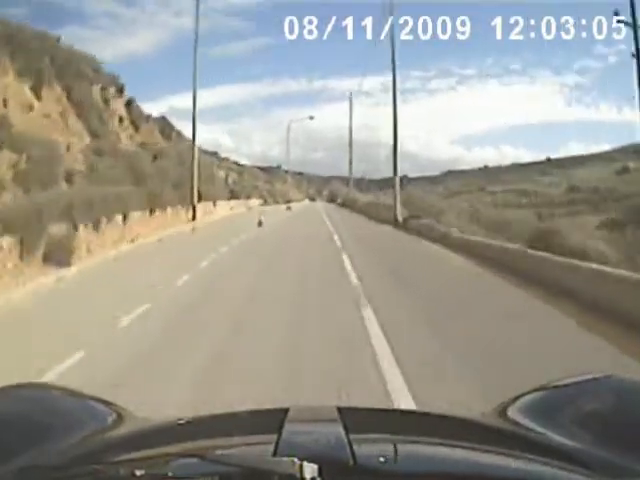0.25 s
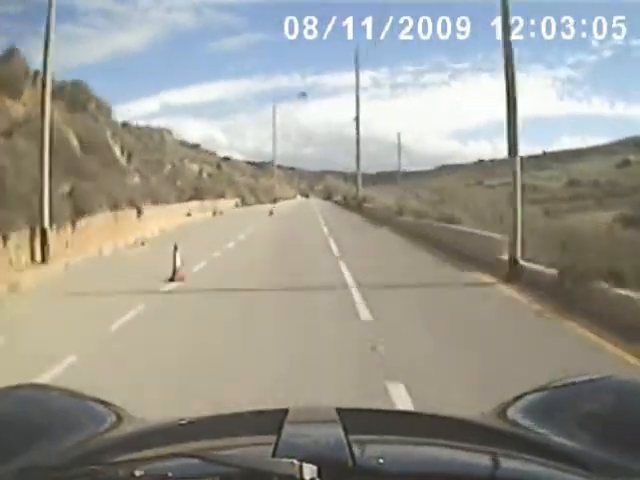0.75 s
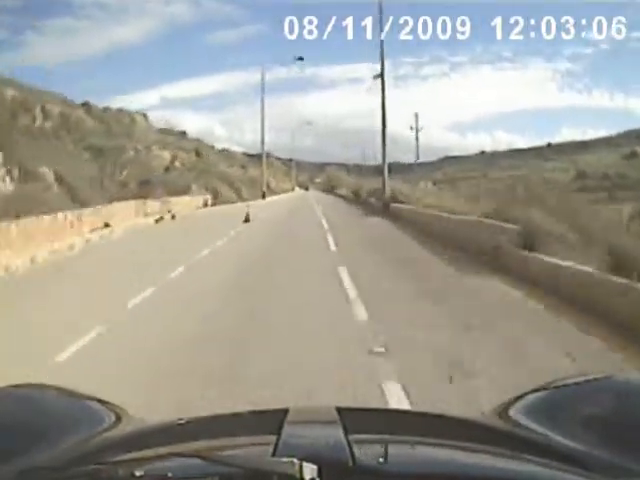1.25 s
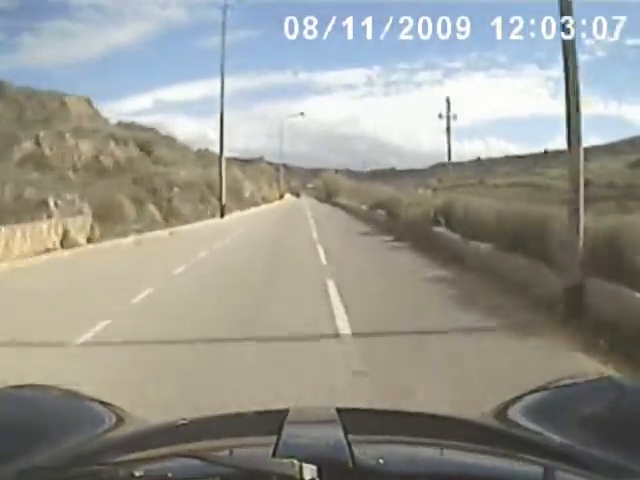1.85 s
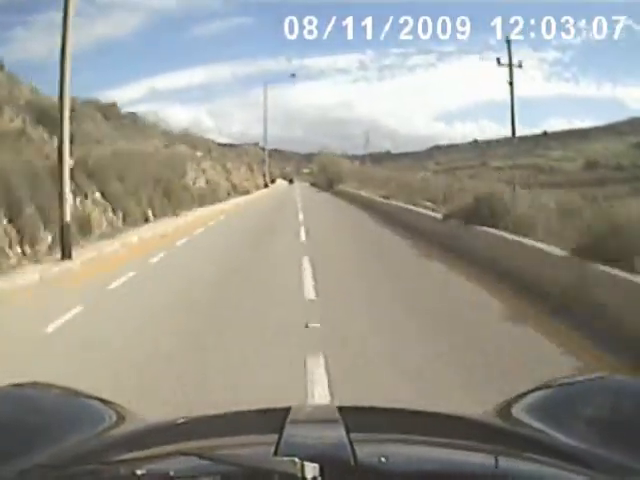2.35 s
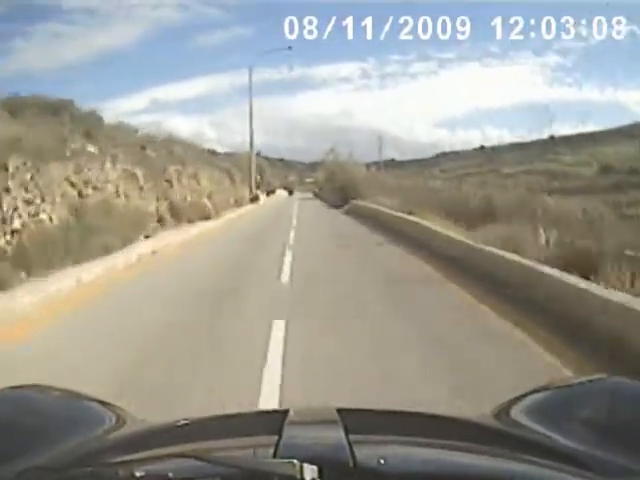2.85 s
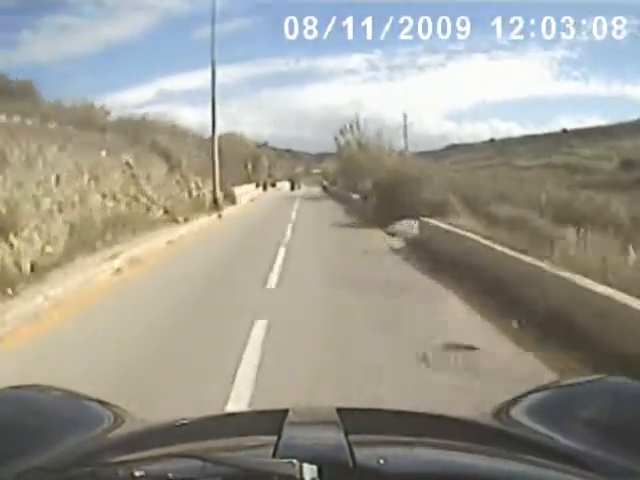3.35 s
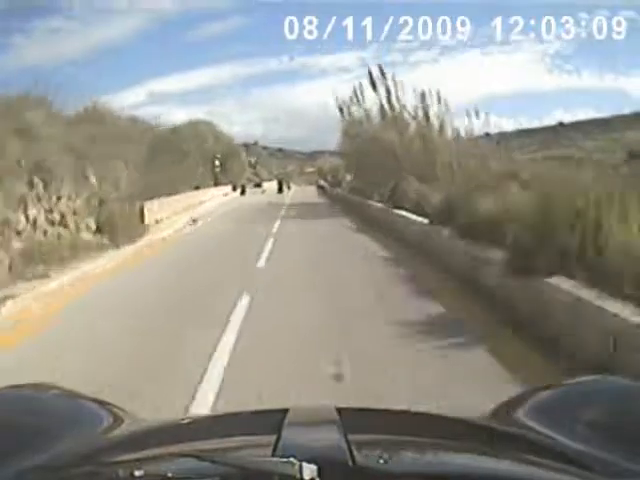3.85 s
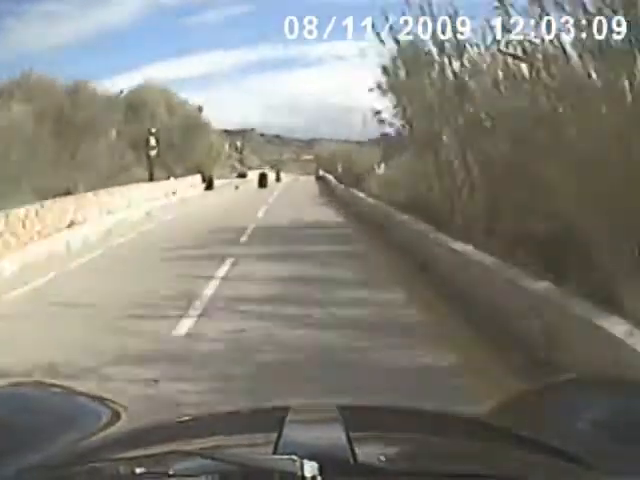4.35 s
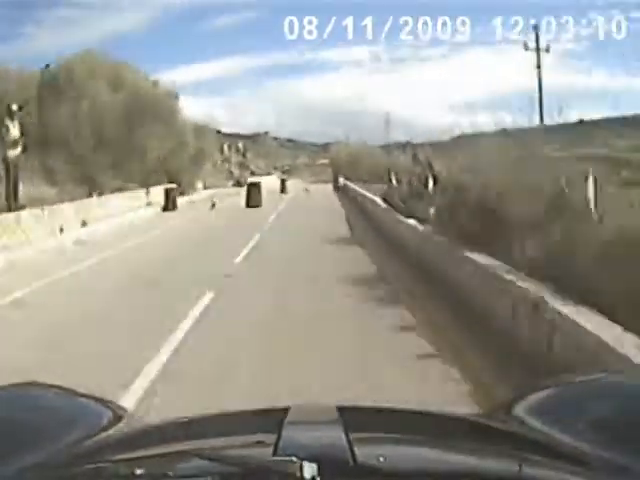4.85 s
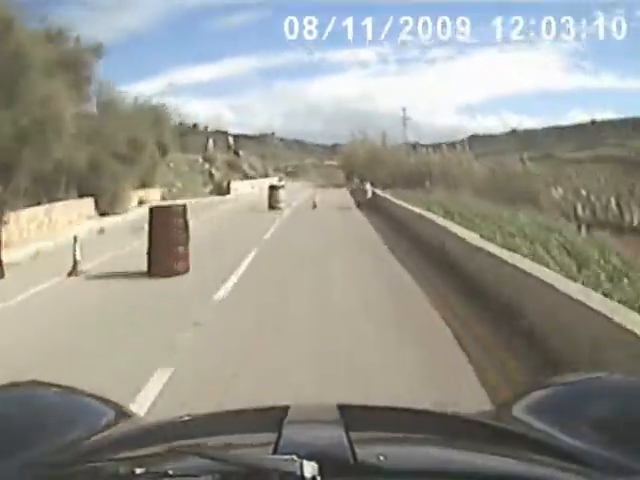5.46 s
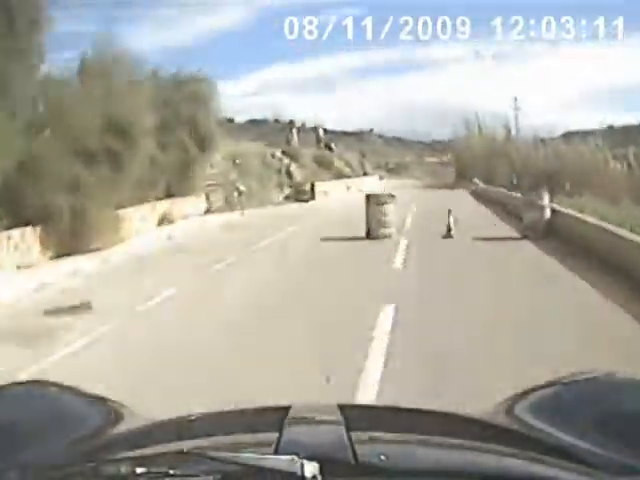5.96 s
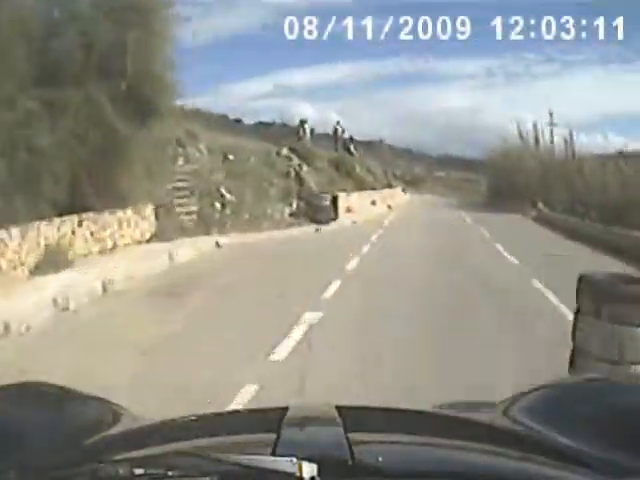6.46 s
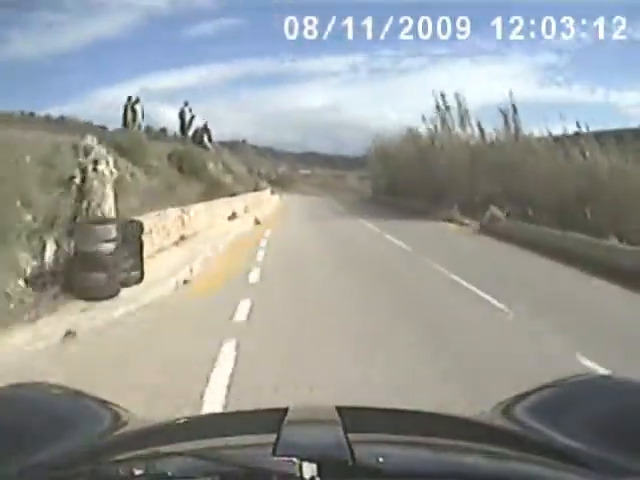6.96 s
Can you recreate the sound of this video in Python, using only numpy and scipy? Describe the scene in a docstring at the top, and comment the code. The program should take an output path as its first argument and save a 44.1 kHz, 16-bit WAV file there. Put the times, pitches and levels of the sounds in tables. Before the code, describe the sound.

Close on-board sound in a small, boomy car on an open road. A hard four-cylinder drone starts suddenly after silence and rises steadily to a gear change. After a short pull the throttle closes, with body knocks, a burst of road rumble and sharp loose-part ticks. Revs blip, then fall to a low hollow overrun, followed by a rattle and renewed pull.

```python
"""After a short silence a four-cylinder sports car bursts in, heard from the cockpit, already pulling hard. It
changes up, lifts, brakes and blips down, then pulls again. The engine is a bank of sines on the multiples of
its four-stroke cycle, ringing through exhaust and cabin. Shaped noise gives intake roar, rasp and road rumble,
and a thin noise fills the top treble early on; faint locked tones are sines. Loose parts tick as short noise
bursts; body knocks and metal chinks are decaying sines."""
import sys
import numpy as np
from scipy import signal
from scipy.fft import rfft, irfft
from scipy.io import wavfile
from scipy.ndimage import uniform_filter1d

SR = 44100
rng = np.random.default_rng(int(sys.argv[2]) if len(sys.argv) > 2 else 0)


def put_to_file(sound):
    """Save the sound as 16-bit audio at rate SR, in the file named by the first command-line argument."""
    columns = np.atleast_2d(sound).T  # one column per channel
    safe = np.clip(columns, -1, 1)
    whole_steps = np.round(safe * 32767)
    wavfile.write(sys.argv[1], SR, whole_steps.astype(np.int16))


N = 318402  # length [samples]


def amp(db):
    """Decibels to gain."""
    return 10 ** (np.asarray(db) / 20)


def evened(x):
    """Scales to rms 1."""
    return x / np.sqrt(np.mean(x ** 2) + 1e-20)


def smoothed_twice(x, size):
    """Two running means in a row along the last axis: a slow, smooth drift."""
    return uniform_filter1d(uniform_filter1d(x, size=size), size=size)


def read_spectrum(points, hz):
    """Reads a spectrum on a log-frequency axis."""
    f, value = np.transpose(points)
    return np.interp(np.log(hz + 1), np.log(f + 1), value)


def curves(rows, step=1):
    """All columns of a table of curves over time, one value every step samples."""
    s, *columns = np.transpose(rows)
    return [np.interp(np.arange(0, N, step) / SR, s, column) for column in columns]


def resonance_gain(modes, hz):
    """Gain of a set of steep resonances, their powers summed."""
    return np.sqrt(sum(amp(db) ** 2 / (1 + (2 * (hz - f) / width) ** 2) ** 1.41 for f, width, db in modes))


def resonance_lag(modes, hz):
    """Phase [rad] that a wave loses on its way through a chain of resonances."""
    return sum(np.arctan(2 * (hz - f) / width) for f, width, _ in modes)


def add(mix, s, sound):
    """Adds a sound at time s [s]."""
    part = mix[round(s * SR):][:len(sound)]
    part += sound[:len(part)]


def noise(spectrum, patchy_db, flicker_db):
    """Coloured noise at rms 1, with random patches of level and a flicker shared by all frequencies."""
    frames, hz = N // 256 + 5, np.fft.rfftfreq(1024, 1 / SR)
    real, imaginary, patches = rng.standard_normal((frames, 513, 3)).T
    patches = uniform_filter1d(patches, size=9, axis=0)  # across frequency
    patches = evened(uniform_filter1d(patches, size=10, axis=1))  # across time
    flicker = evened(uniform_filter1d(rng.standard_normal(frames), size=4))
    db = read_spectrum(spectrum, hz)[:, None] + patchy_db * patches + flicker_db * flicker
    bins = (real + 1j * imaginary) * amp(db)
    return evened(signal.istft(bins, nperseg=1024, noverlap=768)[1][:N])


# engine speed: (time [s], firing rate [Hz])
REVS = [(0.47, 207.8), (0.64, 210), (0.81, 217.9), (0.98, 224), (1.32, 237.7), (1.49, 241.4), (1.66, 249.5),
        (2.0, 259.6), (2.2, 269.3), (2.26, 266.3), (2.32, 251.2), (2.5, 233.3), (2.56, 241.6),
        (2.62, 242.6), (2.8, 199.5), (2.86, 194.9), (2.92, 203), (3.0, 201.2), (3.11, 205.6), (3.22, 205.4),
        (3.33, 208.8), (3.44, 198.9), (3.55, 201.8), (3.77, 195.4), (3.88, 184.3), (4.1, 223.3),
        (4.32, 202), (4.65, 226.1), (4.76, 218.4), (4.98, 208.6), (5.2, 195.5), (5.42, 178.6),
        (5.53, 172.2), (5.86, 149.5), (6.08, 150.8), (6.19, 163.3), (6.41, 154.3), (6.52, 161.1),
        (6.74, 166.3), (6.96, 174.2), (7.07, 170.6), (7.2, 177.1)]


def cycles():
    """Four-stroke cycles run so far: four firings each."""
    return np.cumsum(curves(REVS)[0]) / (4 * SR)


def octaves_up():
    """Engine speed in octaves above 200 firings a second."""
    return np.log2(curves(REVS)[0] / 200)


# share of each order of the four-stroke cycle inside its family: (order, relative level [dB])
SHARE = [(1, -28), (2, -5), (3, 4), (5, 3.5), (6, -4), (7, 8), (9, 4), (10, 2.5), (11, 5), (13, 6.5),
         (14, 0), (15, 6.5), (16, 3.5), (17, 4), (20, 4), (24, 0.5), (28, 1), (40, -0.5), (56, -10)]
# cabin and exhaust resonances: (frequency [Hz], width [Hz], relative level [dB])
CABIN = [(50, 44, -10.5), (115, 24, 3), (169.2, 19, 11.5), (213, 12.3, 15), (337, 28, 6), (389, 28.4, -1),
         (498, 92, -1), (599, 59, 8), (730, 33, 9.5), (737.5, 17.6, 10.5), (828, 94, 3), (1070, 85, -3.5),
         (1200, 27, -2.5), (1365, 230, -5), (1483, 240, -8), (2200, 365, -10)]


def order_weights(order, hz, throttle, bright_db, dull, keen_db):
    """Balance of the orders, set by their shares and the cabin, tilted by revs and throttle."""
    weight = amp(np.interp(order, *np.transpose(SHARE))) * resonance_gain(CABIN, order * hz / 4)
    octaves = np.log2(np.maximum(order, 5) / 8)
    # uneven orders brighten with revs
    weight *= amp(bright_db * np.log2(hz / 220) * octaves * (order % 2))
    # crank orders turn dull when the throttle shuts
    weight *= amp(dull * (throttle - 2) * octaves * (order % 4 == 2))
    # on the overrun the high firing orders stand out
    return weight * amp(keen_db * (0.5 - throttle) * np.log2(order / 16) * (order % 4 == 0))


# families that follow the throttle; rows: firing order, its second, its third, uneven cylinders
# (throttle-open level [dB], shut level [dB], how late the family wakes as the throttle opens [exponent])
FAMILIES = [(0.5, -10.5, 1.046), (1.5, -5.5, 2.8), (-13.5, -13.5, 0.59), (-23.5, -58, 3.38)]
# how the exhaust pipe passes the firing note and its overtones: (frequency [Hz], level [dB])
PIPE = [(150, -25.5), (157, -21.5), (170, -28), (190, -29.5), (212, -18.5), (228, -21.5), (245, -26),
        (254, -23), (267, -31.5), (300, -25.5), (320, -27.5), (343, -22), (356, -39), (385, -29),
        (408, -23.5), (445, -29), (465, -33), (485, -19), (525, -22), (550, -31.5), (625, -21.5),
        (655, -25.5), (672, -17), (700, -19), (722, -29.5), (750, -17.5), (785, -28), (810, -19)]
# (time [s], level of the higher firing orders [dB], level of the crank orders [dB])
UPPER = [(.47, -35.5, -31.5), (1.15, -36, -36.5), (1.24, -34.5, -33.5), (1.85, -44, -40),
         (2.22, -29.5, -39), (2.32, -50, -45), (2.52, -49, -44), (2.62, -33, -40), (2.8, -34.5, -35),
         (3.29, -36.5, -31.5), (3.37, -52, -42), (3.57, -55, -38.5), (3.7, -44, -64), (3.95, -48, -38),
         (4.2, -39.5, -45), (4.4, -42, -46), (4.7, -41.5, -33.5), (4.9, -42, -33.5), (5.1, -43.5, -47),
         (5.6, -51.5, -49), (6.1, -54, -54), (6.2, -43.5, -45), (6.5, -48, -54), (6.63, -40.5, -38),
         (7.2, -39, -59)]
UNEVEN_DB_PER_OCTAVE = 3  # uneven orders grow with revs


def order_gains(order, hz, throttle, note_db, overtones_db, weight):
    """Level of each order: the pipe shapes the lowest three firing orders, the weights all the others."""
    levels = [amp(shut_db + (open_db - shut_db) * throttle ** late) for open_db, shut_db, late in FAMILIES]
    note = amp(read_spectrum(PIPE, order * hz / 4) + np.where(order == 4, note_db, overtones_db))
    gain = sum((order == k) * note * level for k, level in zip((4, 8, 12), levels))

    uneven = (order % 2 == 1) * weight * amp(UNEVEN_DB_PER_OCTAVE * np.log2(hz / 220))
    gain = gain + uneven * levels[3] / np.sqrt((uneven ** 2).sum(axis=0).mean())

    higher_firing, crank = (order % 4 == 0) & (order > 12), order % 4 == 2
    for family, db in zip((higher_firing, crank), curves(UPPER, step=64)):
        share = family * weight
        gain = gain + share * amp(db) / np.sqrt((share ** 2).sum(axis=0))
    return gain


# the driver's foot and the engine's answer:
# (time [s], throttle [0-1], firing note level [dB], level of its overtones [dB])
DRIVE = [(.47, 0.94, -2, -0.5), (.64, 0.98, -1, -7), (.9, 0.95, -2, 1), (1.3, 0.95, -1, 3),
         (2.22, 0.98, 0.5, -1), (2.3, 0.65, -1, -6), (2.45, 0.4, 1.5, 1), (2.5, .3, 3, -8),
         (2.55, 1, -3, -3), (2.86, 0.93, -2.5, 1), (3.3, 0.96, -0.5, 0), (3.37, 0.6, -11.5, -2.5),
         (3.44, 0.52, -9, -23), (3.55, 0, 6.5, -3), (3.8, 0.7, -6, -3.5), (3.88, .7, -27, -2),
         (3.99, 0.3, -3, -3), (4.12, 0.6, -16, -6.5), (4.3, 0.57, -11, -3), (4.43, 0.27, -11.5, 0.5),
         (4.54, 0.53, -1.5, -0.5), (4.65, 0.6, -10, -4), (4.8, 0.34, -0.5, 0), (4.98, 0.1, 0, 3.5),
         (5.15, 0.52, -6, -1), (5.3, 0, 4.5, 4), (5.55, 0, 5.5, -6.5), (5.75, 0, 2.5, -6),
         (6.05, 0.2, -1.5, -13), (6.13, 0, -12, -11), (6.19, 0.33, -1, 1), (6.45, 0.03, -10, -1.5),
         (6.63, 0.58, -11, -5), (6.8, 0.84, -8.5, -2.5), (7.2, .9, -6, -5)]


def engine_orders(waver_db, wander, spread, ringing, bright_db, dull, keen_db):
    """Sines on the multiples of the four-stroke cycle, each wavering in level and phase."""
    hz = curves(REVS, step=64)[0]
    throttle, note_db, overtones_db = curves(DRIVE, step=64)
    throttle = np.clip(throttle, 0, 1)
    order = np.arange(1, 57)[:, None]
    weight = order_weights(order, hz, throttle, bright_db, dull, keen_db)
    gain = order_gains(order, hz, throttle, note_db, overtones_db, weight)

    chance = rng.standard_normal((2, len(order), len(hz)))
    level_drift, phase_drift = (evened(smoothed_twice(c, size=30)) for c in chance)
    unrest = order / 12  # high orders waver more
    gain = np.sqrt(2) * gain * amp(waver_db * unrest * level_drift)
    # low orders stay near-aligned and throb once a cycle; the cabin smears each pulse in time
    phase = unrest * (wander * phase_drift + spread * rng.standard_normal(order.shape))
    phase -= ringing * resonance_lag(CABIN, order * hz / 4)

    cycle, at, coarse = cycles(), np.arange(N), np.arange(len(hz)) * 64
    return sum(np.interp(at, coarse, g) * np.cos(2 * np.pi * k * cycle + np.interp(at, coarse, p))
               for k, g, p in zip(order[:, 0], gain, phase))


def puffing(depth, uneven):
    """Each firing lets out a puff; one cylinder puffs harder."""
    turn = 2 * np.pi * cycles()
    return evened(np.exp(depth * np.cos(4 * turn) + uneven * np.cos(turn)))


# colour of the roar: (frequency [Hz], relative density [dB per Hz])
ROAR = [(60, -35), (140, -3), (230, -23.5), (300, -3), (480, 2), (740, -9), (1000, -13), (1400, -14.5),
        (1800, -33), (6000, -100)]
# swells of the roar: (time [s], level [dB])
ROARING = [(.47, -30.5), (.64, -37), (1.2, -34.5), (1.9, -29), (2.1, -34.5), (2.26, -28.5), (2.48, -33.5),
           (2.66, -29.5), (2.82, -41), (3.15, -40), (3.35, -33), (3.68, -33), (3.78, -29), (3.83, -32.5),
           (3.88, -25.5), (3.94, -31.5), (4.04, -30.5), (4.43, -36.5), (5.2, -40), (6.05, -41.5),
           (6.15, -37), (6.41, -39.5), (6.55, -32.5), (6.74, -39), (7.2, -38.5)]


def roar():
    """Turbulent intake and body boom between the orders: noise puffing with the firings."""
    sound = noise(ROAR, patchy_db=-2.0, flicker_db=2.0)
    return amp(curves(ROARING)[0]) * sound * puffing(depth=.3, uneven=0.12)


# colour of the rasp: (frequency [Hz], relative density [dB per Hz])
RASP = [(600, -28), (900, -7.5), (1100, -4), (1450, -4), (1870, -10), (2250, -8), (2750, -10.5),
        (3000, -17.5), (3510, -14.5), (4000, -21.5), (5100, -23), (6900, -27), (8000, -33), (12800, -35.5),
        (13500, -49.5), (14200, -88)]
RASP_DB, RASP_OPEN_DB, RASP_DB_PER_OCTAVE = -46, 2.5, 12  # throttle shut, gain when open, rise with revs
RASP_SHAKE = 0.17  # share of the road rumble's slow swings [dB] that the rasp follows


def rasp():
    """Valve gear and exhaust hiss, chopped by the firings; grows with revs and on rough road."""
    road_swing_db = uniform_filter1d(curves(ROAD)[0], size=20000) + 42
    db = RASP_DB + RASP_OPEN_DB * curves(DRIVE)[0]
    db = db + RASP_DB_PER_OCTAVE * octaves_up() + RASP_SHAKE * road_swing_db
    return amp(db) * noise(RASP, patchy_db=1.5, flicker_db=0.23) * puffing(depth=0.053, uneven=0.042)


# swells of faint tones locked to the engine cycle: gear whine at 83.5 turns, high firing orders at 36 and 44
# (centre [s], half length [s], level [dB], turns per four-stroke cycle)
LOCKED_TONES = [(1.57, .06, -57, 83.5), (5.55, .2, -57, 36), (5.55, .2, -59, 44), (5.6, .22, -63, 83.5),
                (6.28, .08, -61, 83.5), (6.95, .2, -66, 83.5)]


def locked_tones():
    """Gear whine and high firing orders: sines locked to the engine cycle, wavering in level and phase."""
    waver = evened(smoothed_twice(rng.standard_normal(N), size=1500))
    t, cycle_phase = np.arange(N) / SR, 2 * np.pi * cycles()
    tones = sum(amp(db) * np.exp(-((t - s) / half) ** 2) * np.sin(turns * cycle_phase + 0.49 * waver)
                for s, half, db, turns in LOCKED_TONES)
    return amp(1.4 * waver) * tones


# dull blows through the body, from the exhaust or the suspension:
# (time [s], level before attack and decay [dB], brightness [dB per octave])
KNOCKS = [(2.512, -18.5, 2.5), (2.533, -14, 2), (3.416, -25, -10), (3.745, -30, 10), (3.772, -24, 2),
          (3.80, -25, 1), (3.813, -25.5, 9), (3.865, -22, 0), (3.995, -25, -2), (4.004, -22, 2),
          (6.481, -31, 7), (6.505, -32, 7), (6.553, -28, 4)]


def knocks():
    """Each blow rings the cabin resonances for a moment as quickly dying sines."""
    out, t = np.zeros(N), np.arange(2000) / SR
    envelope = (1 - np.exp(-t / 0.00043)) * np.exp(-t / 0.0083)
    for (s, db, tilt_db), turns in zip(KNOCKS, rng.random((len(KNOCKS), len(CABIN)))):
        ring = sum(amp(level + tilt_db * np.log2(hz / 500)) * np.sin(2 * np.pi * (hz * t + turn))
                   for (hz, _, level), turn in zip(CABIN, turns))
        add(out, s, amp(db) * evened(ring) * envelope)
    return out


# loose parts knocking: (time [s], nominal peak level [dB], brightness [dB per octave], length [ms])
TICKS = [(3.657, -26.5, -8, 4.9), (3.672, -33, 11, 3.8), (3.699, -25, -4, 2.32), (3.721, -22, 0.5, 2.1),
         (3.766, -31, 1, 3.6), (3.772, -25, -8, 4.4), (3.811, -25, -3, 4.5), (3.890, -18, 10, 2.4),
         (3.897, -25.5, -8, 7.5), (3.919, -42, 11, 4.9), (4.168, -20, 9.5, 3.8), (4.207, -22.5, -0.5, 2.5),
         (4.304, -26.5, 3, 2.5), (4.347, -35, 2, 5.8), (4.372, -26, 0, 2.2), (4.554, -37, 8, 3.6),
         (5.085, -30, 1.5, 6.2), (5.132, -40, 5, 7.1), (5.525, -39.5, 10, 6.6), (6.110, -31.5, -3, 8.1),
         (6.163, -30.5, -15, 12.6), (6.226, -41, -1, 6.6), (6.312, -39, 11, 3), (6.419, -33, 0, 3.1),
         (6.436, -40, 6, 6.6), (6.480, -28, -1.5, 7.1), (6.496, -25, -2, 3.5), (6.507, -33, -2, 5.4),
         (6.548, -15, -0.5, 5.6), (6.586, -33, -5, 9.7), (6.621, -30, -2, 4.7), (6.633, -33.5, -3, 10.6),
         (6.669, -35, 0, 3.7), (6.688, -30, 0, 3.6), (6.762, -34, 0, 13.4), (6.820, -33, 5, 2.2),
         (6.844, -36, 4, 3.4), (7.062, -29.5, -5, 10.6), (7.149, -32, 4.5, 11), (7.200, -42, 5, 4.2)]
# what the ticks ring in: (frequency [Hz], width [Hz], relative level [dB])
PANEL = [(2370, 370, 10), (4040, 1040, 2), (5860, 1860, -1), (7840, 810, -32), (10140, 450, -12),
         (11170, 290, -20), (11850, 280, -11)]


def ticks(rows):
    """Short bursts of noise in the panel resonances, with a weaker rattle after."""
    out, t, hz = np.zeros(N), np.arange(2048) / SR, np.fft.rfftfreq(2048, 1 / SR)
    # nothing below 900 Hz, steep fall above 13.3 kHz
    panel = resonance_gain(PANEL, hz) * (hz > 900) / (1 + (hz / 13300) ** 24)
    for (s, db, tilt_db, ms), burst in zip(rows, rng.standard_normal((len(rows), len(t)))):
        colour = panel * amp(tilt_db * np.log2((hz + 1) / 5000))
        u = t * 1000 / max(ms, .3)  # time in tick lengths
        shape = (1 - np.exp(-t / 0.0013)) * (np.exp(-u ** 2) + 0.3 * np.exp(-u / 2.9))
        # noise peaks stand about 10 dB above its rms
        add(out, s, amp(db - 10) * evened(irfft(rfft(burst) * colour)) * shape)
    return out


# faint ticks: rate, lowest nominal peak, spread above it, brightness per octave, length
FAINT_PER_S, FAINT_DB, FAINT_SPREAD_DB, FAINT_TILT_DB, FAINT_MS = 11, -48, 3, 16, 3


def faint_ticks():
    """Tick rows at random moments: many weak ones, few stronger."""
    when, size = rng.random((round(FAINT_PER_S * N / SR), 2)).T
    levels_db = FAINT_DB - FAINT_SPREAD_DB * np.log(1 - size * 7 / 8)
    return [(s * N / SR, db, FAINT_TILT_DB, FAINT_MS) for s, db in zip(when, levels_db)]


# a small metal part struck: (time [s], level [dB])
CHINKS = [(3.964, -35), (4.01, -51.5), (4.091, -54), (4.26, -61), (4.797, -46)]
# its ringing modes: (frequency [Hz], relative level [dB], time to fall 60 dB [s])
METAL = [(7190, -3, 0.063), (9070, -19, .06), (9960, -1, 0.044), (11100, -14, .06), (13500, 2, 0.012)]


def chinks():
    """A small metal part rings briefly as a handful of decaying sines."""
    out, t = np.zeros(N), np.arange(4000) / SR
    ring = sum(amp(db - 60 * t / t60) * np.sin(2 * np.pi * hz * t) for hz, db, t60 in METAL)
    for s, db in CHINKS:
        add(out, s, amp(db) * ring * (1 - np.exp(-t / 0.0032)))
    return out


# colour of the rumble: (frequency [Hz], relative density [dB per Hz])
RUMBLE = [(10, 3), (26, -4), (45, -4), (70, -16.5), (130, -10), (260, -12), (450, -36), (1500, -95)]
# swells of the rumble: (time [s], level [dB])
ROAD = [(.5, -45), (1.0, -42.5), (1.5, -38), (2.19, -37.5), (2.26, -34.5), (2.52, -38), (2.85, -38),
        (3.0, -38.5), (3.11, -41), (3.61, -34.5), (3.78, -23), (3.87, -25.5), (4.15, -38), (4.5, -38),
        (4.95, -43), (5.08, -38), (5.46, -42), (5.75, -43), (5.85, -36), (6.2, -43.5), (6.57, -45),
        (7.01, -35.5), (7.2, -40)]


def rumble():
    """Tyres and wind shake the body: low noise that swells with the road."""
    return amp(curves(ROAD)[0]) * noise(RUMBLE, patchy_db=-1.5, flicker_db=1.5)


# colour of the top-treble hiss: (frequency [Hz], relative density [dB per Hz])
TOP_HISS = [(8000, -36), (12000, -11), (14000, 0), (15200, -3.5)]
# the hiss is heard early only: (time [s], level [dB])
TOP_HISS_LEVEL = [(.47, -68), (1.9, -60), (2.15, -62), (2.3, -110)]


def top_hiss():
    """A thin top-treble noise hiss, early only."""
    return amp(curves(TOP_HISS_LEVEL)[0]) * noise(TOP_HISS, patchy_db=-2.0, flicker_db=3.5)


def scene():
    """Everything in the cockpit."""
    engine = engine_orders(waver_db=1.34, wander=0.11, spread=1.24, ringing=0.68,
                           bright_db=12.5, dull=7.5, keen_db=7)
    engine = engine + roar() + rasp() + locked_tones()
    loose_parts = ticks(TICKS + faint_ticks()) + chinks()
    return (engine + knocks() + loose_parts + rumble() + top_hiss())[None]


START_S, EDGE_HZ = .467, 15100  # where the sound sets in [s], upper band edge [Hz]


def record(dry):
    """Silence, an abrupt opening within 0.75 ms, and a steep low-pass."""
    gate = np.clip((np.arange(N) / SR - START_S) / 0.00075, 0, 1)
    low_pass = signal.firwin(2047, EDGE_HZ, window=("kaiser", 11), fs=SR)
    return signal.oaconvolve(dry * gate, low_pass[None], "same")


dry = scene()
out = record(dry)
put_to_file(out)
```